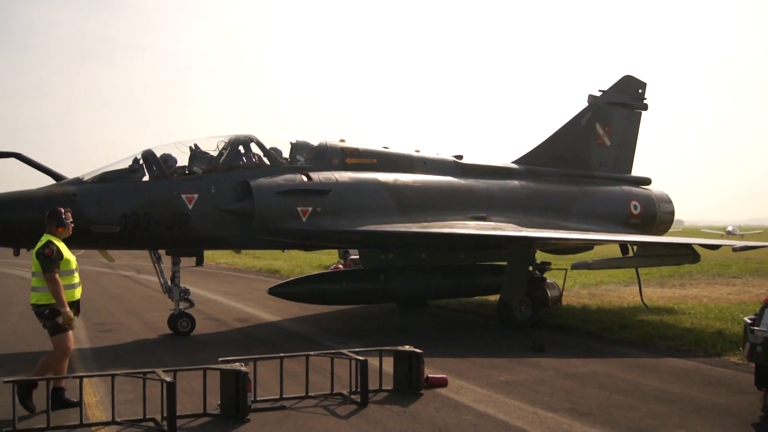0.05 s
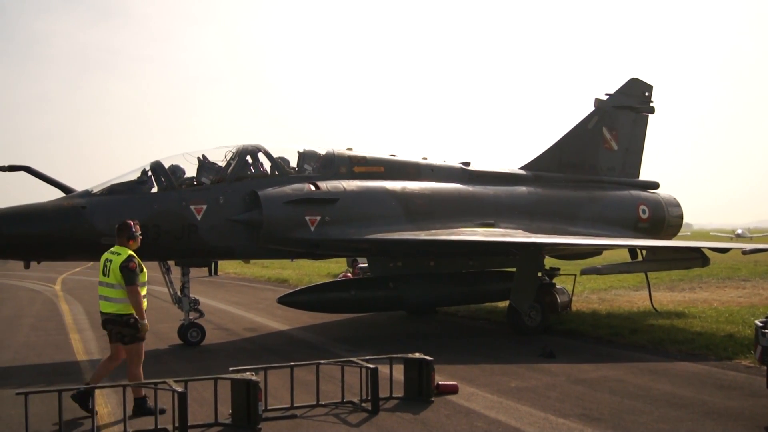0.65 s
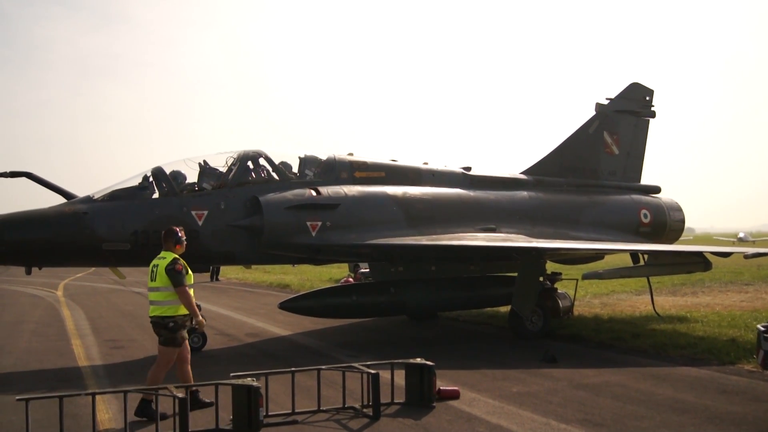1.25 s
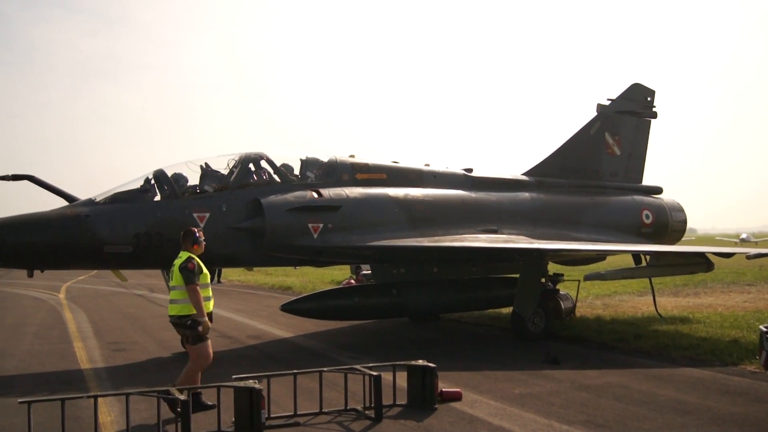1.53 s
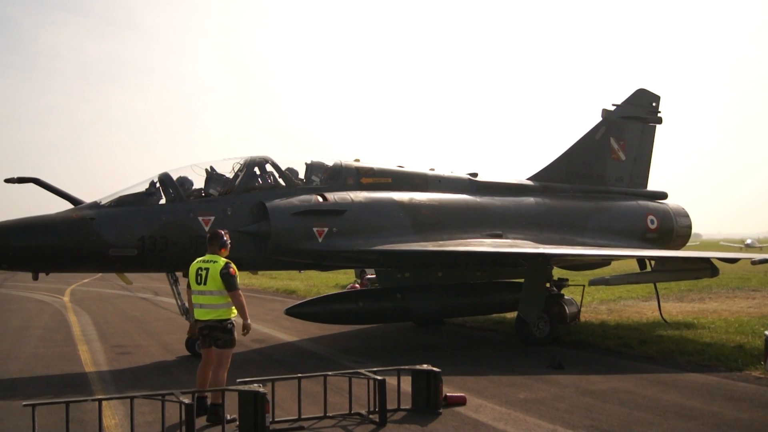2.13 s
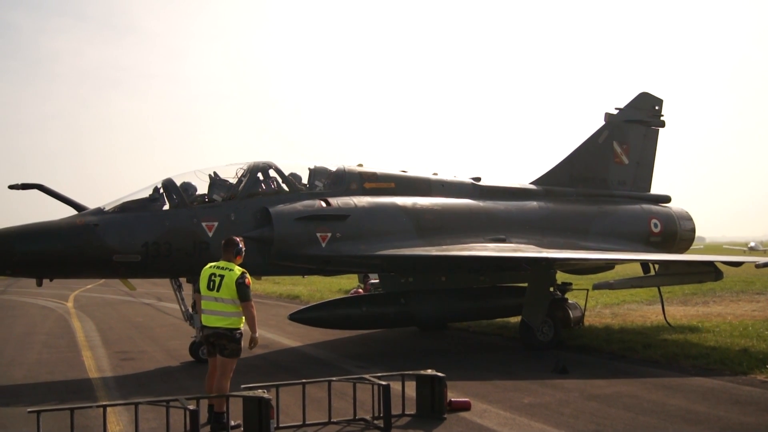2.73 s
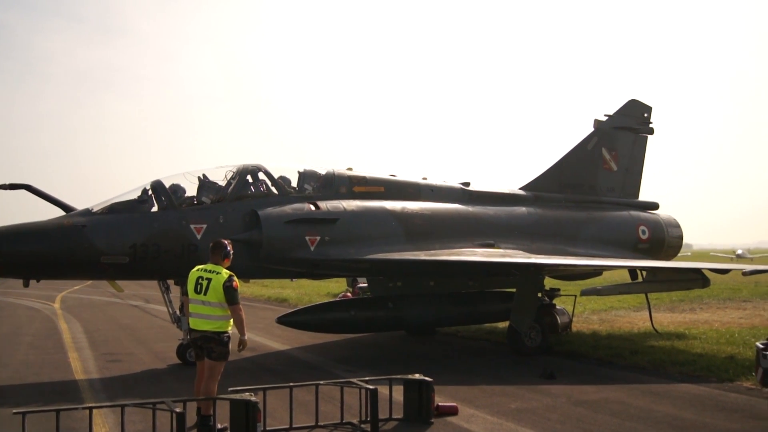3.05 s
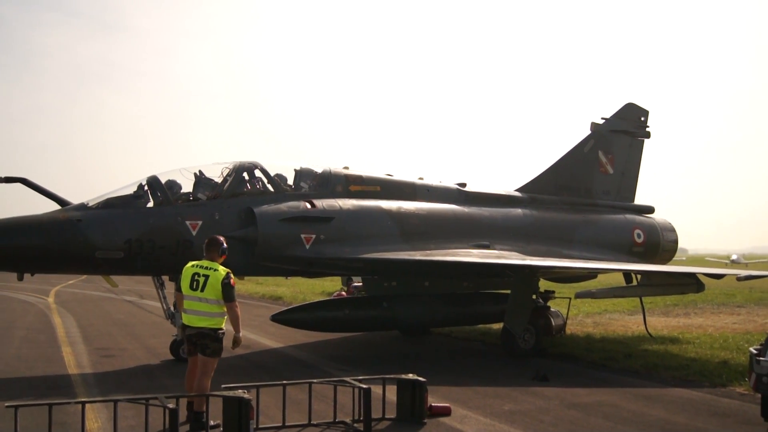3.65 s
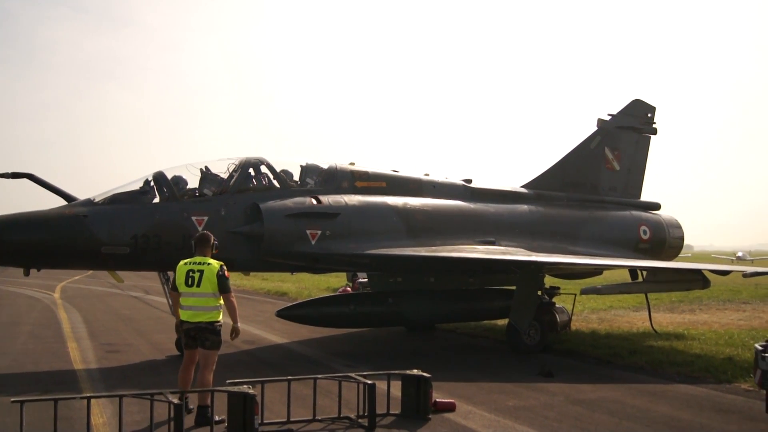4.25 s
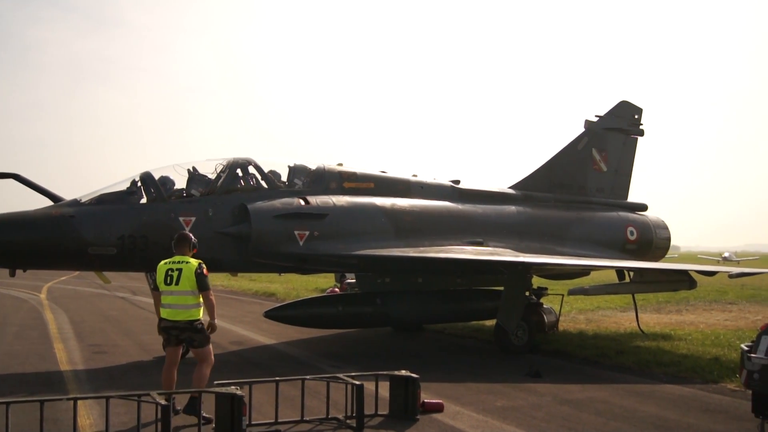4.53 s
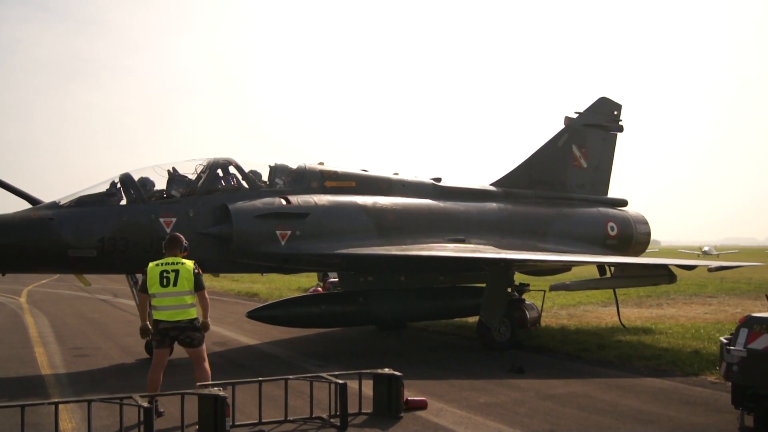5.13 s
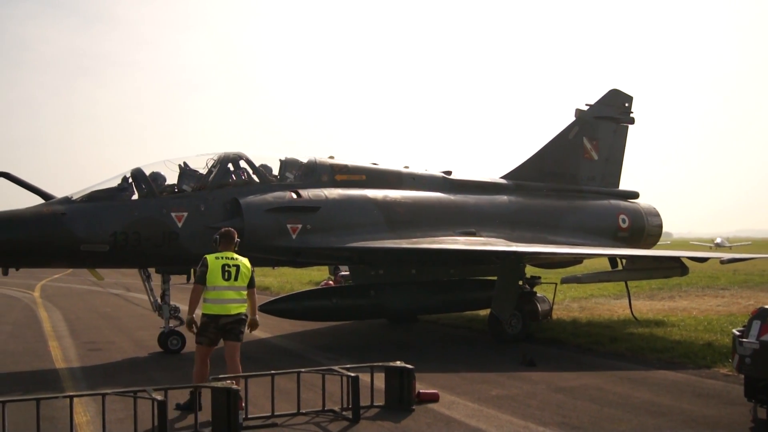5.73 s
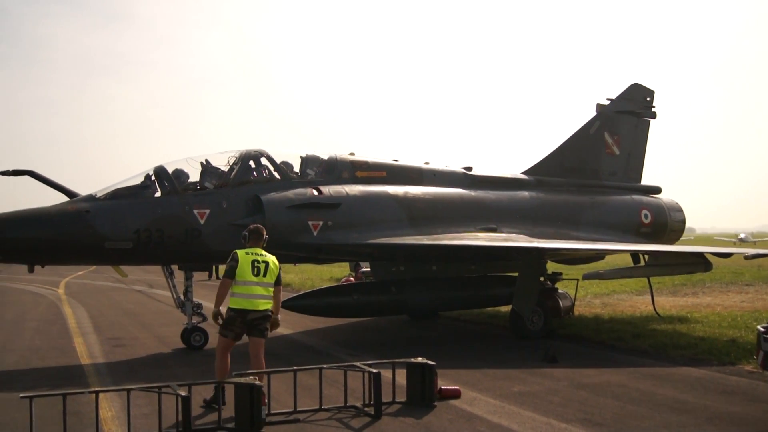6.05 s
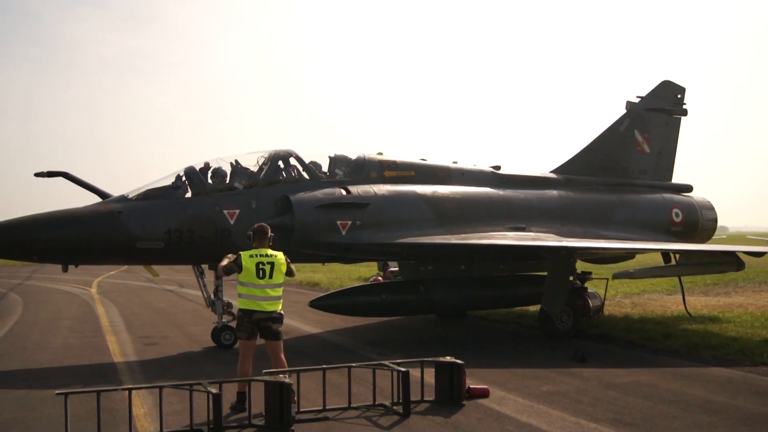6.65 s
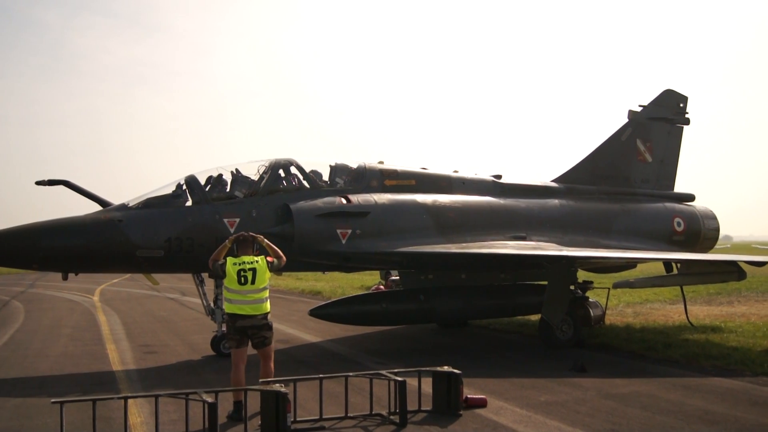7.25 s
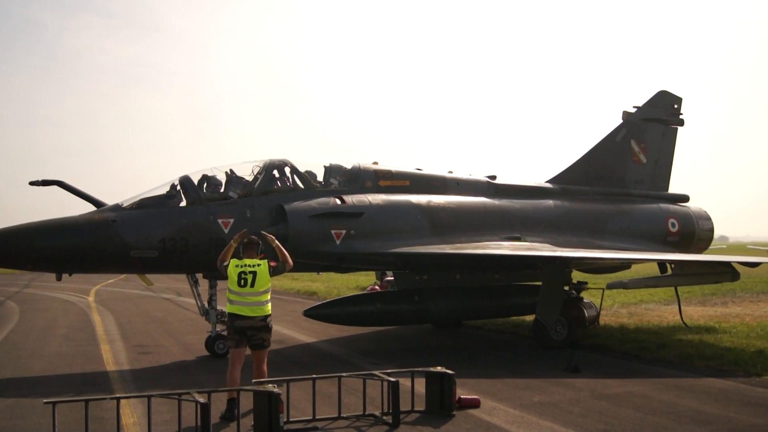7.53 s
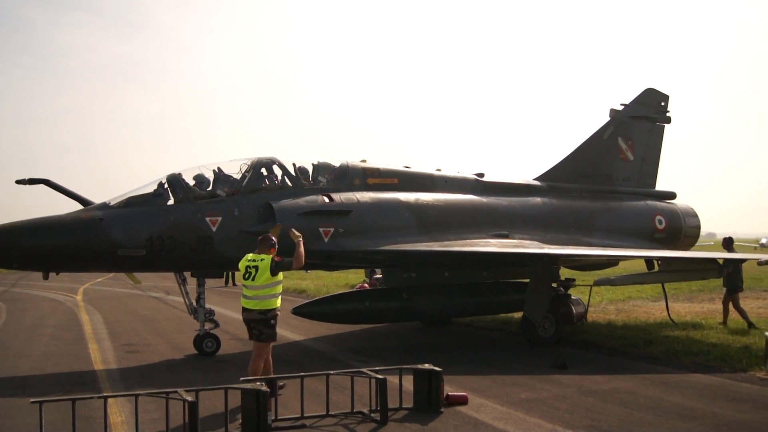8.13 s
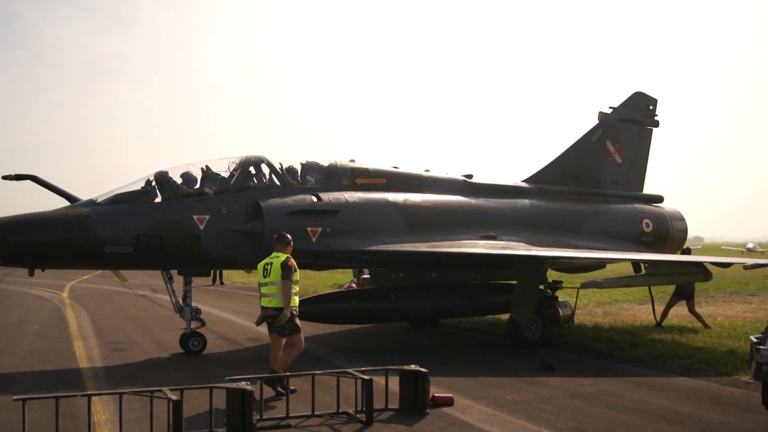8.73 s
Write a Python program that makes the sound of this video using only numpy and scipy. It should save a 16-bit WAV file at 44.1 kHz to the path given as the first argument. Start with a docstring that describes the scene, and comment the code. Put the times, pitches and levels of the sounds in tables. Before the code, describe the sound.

A fighter jet's engine is starting up on an open apron, heard side-on from some way off. A loud, steady rush of air fills all nine seconds, carrying a high whine and a lower howl, with only a very faint deep drone beneath. A hissing tone above the whine fades within the first second or two, and a faint, very high whistle slides down and vanishes by about 3 seconds. The whine and howl climb until about 4 seconds, the whine turning breathier after 2 seconds. A faint low rumble swells near 3.6 seconds and dies away. Around 4 to 4.5 seconds the pitch peaks and the howl weakens. Both then slide down until about 6 seconds, the howl returning and the whine ringing clearly again. The pitch lifts slightly, and from about 7.5 seconds the engine holds a steady idle.

```python
"""A jet fighter's engine starts on an open apron, heard side-on from some way off.
From the outset turbulent air roars through resonances that follow the turbine: a low howl, a high whine.
Early on a hissing tone fades and a small rotor coasts down with a thin whistle. The burner's rumble
swells at 3.6 s and dies away over a deep drone. Near 4 s the turbine overshoots and the howl breaks down;
it returns as the speed sags, and from about 7 s the engine settles at idle."""
import sys
import numpy as np
from scipy import signal
from scipy.io import wavfile

SR = 44100
rng = np.random.default_rng(int(sys.argv[2]) if len(sys.argv) > 2 else 0)


def store_pcm(level_fs):
    """Save levels as 16-bit WAV."""
    pcm = np.round(np.clip(level_fs, -1, 1) * 32767).astype(np.int16)
    wavfile.write(sys.argv[1], SR, np.atleast_2d(pcm).T)


N = 388080
FRAME, HOP = 2048, 256
T = np.arange(N) / SR
FRAME_T = np.arange(N // HOP + 3)[:, None] * HOP / SR
HZ = np.fft.rfftfreq(FRAME, 1 / SR)
IDLE_HZ = 4340  # whine pitch at idle


def gain_of(db):
    return 10 ** (np.asarray(db) / 20)


def unit_rms(x):
    return x / np.sqrt(np.mean(x ** 2) + 1e-20)


def over_frequency(rows):
    hz, value = np.transpose(rows)
    return np.interp(np.log(HZ + 1), np.log(hz + 1), value)


def over_time(rows, t=FRAME_T):
    return np.interp(t, *np.transpose(rows))


def by_speed(speed, idle_db, db_per_octave, db_per_octave_squared):
    """Level in dB at a speed in octaves above idle."""
    return idle_db + db_per_octave * speed + db_per_octave_squared * speed ** 2


def wander(slow_hz, fast_hz):
    """Random drift per frame, rms 1."""
    rates_hz = np.geomspace(slow_hz, fast_hz, num=30)
    return unit_rms(sum(np.sin(2 * np.pi * (hz * FRAME_T + rng.random())) for hz in rates_hz))


def narrow_noise(hz, width_hz):
    """Noise band on a pitch curve, rms 1."""
    pole = np.exp(-np.pi * width_hz / SR)
    white = rng.standard_normal(N) + 1j * rng.standard_normal(N)
    envelope = signal.lfilter([1], [1, -2 * pole, pole * pole], white)
    phase = 2 * np.pi * np.cumsum(hz * np.ones(N)) / SR
    return unit_rms((envelope * np.exp(1j * phase)).real)


def resonance(hz, relative_half_width, peak_db):
    """Power spectrum of one hump."""
    detune = (HZ / hz - 1) / relative_half_width
    return gain_of(peak_db) ** 2 / (1 + detune ** 2 / 2) ** 2


# Bass level of drone and roar. Each row: time in seconds, level in dB.
BASS_DB = [(0, 0.5), (3.1, 0.7), (3.65, 1.5), (4.2, -4.5), (5.3, -6), (6.1, 0), (7.1, 0.5), (8.8, -4.5)]


def drone(hz=48.5, base_db=-65.5, db_per_bass_db=1.2):
    """A deep drone that rises and falls with the bass."""
    db = base_db + db_per_bass_db * over_time(BASS_DB, T)
    return gain_of(db) * narrow_noise(hz, width_hz=12)


def burner(start_hz=312, end_hz=224, sink_s=1.5, base_db=-46.5, swell_s=3.62, fade_db_per_s=22):
    """The burner's rumble sinks in pitch as the engine spools up, swells once and dies away."""
    hz = end_hz + (start_hz - end_hz) * np.exp(-T / sink_s)
    swell_db = 9 * np.exp(-((T - swell_s) / 0.24) ** 2)
    db = base_db + swell_db - fade_db_per_s * np.maximum(T - swell_s, 0)
    return gain_of(db) * narrow_noise(hz, width_hz=30)


def rotor_whistle(start_hz=12850, coast_s=5.55, resonance_hz=10350, base_db=-49.5,
                  rise_db_per_s=1.5, fade_from_s=2.4, fade_db_per_s=35):
    """A small rotor coasts down and fades, loudest as it passes one resonance."""
    hz = start_hz * np.exp(-T / coast_s)
    resonance_db = 10.5 / (1 + ((hz - resonance_hz) / 340) ** 2)
    fade_db = fade_db_per_s * np.maximum(T - fade_from_s, 0)
    sides = np.array([narrow_noise(hz, width_hz=100) for _ in range(2)])
    return gain_of(base_db + resonance_db + rise_db_per_s * T - fade_db) * sides


# Turbine speed. Each row: time in seconds, whine pitch in Hz.
TURBINE_HZ = [(0.0, 3790), (0.45, 3890), (1.0, 4025), (2.0, 4350), (2.8, 4700), (3.95, 5508), (4.4, 5450),
              (4.75, 4899), (5.3, 4290), (5.9, 4069), (6.9, 4163), (7.6, 4345), (8.8, 4298)]


def hissing_tone(multiple=1.44, full_db=-33.5, fade_from_hz=3830, fade_db_per_octave=115):
    """A hissing tone above the whine, only at low speed."""
    whine_hz = over_time(TURBINE_HZ, T)
    db = full_db - fade_db_per_octave * np.maximum(np.log2(whine_hz / fade_from_hz), 0)
    return gain_of(db) * narrow_noise(multiple * whine_hz, width_hz=140)


# Ground notches. Each row: centre in Hz, half width in Hz, depth in dB.
GROUND_NOTCHES = [(592, 49, 9.5), (1377, 90, 13), (2380, 62, 21), (3510, 145, 8)]


def ground_loss_db():
    """The reflection off the tarmac cancels fixed bands."""
    return sum(db / (1 + ((HZ - hz) / width_hz) ** 2) for hz, width_hz, db in GROUND_NOTCHES)


# Likeness of the two sides. Each row: frequency in Hz, coherence from 0 to 1.
COHERENCE = [(50, .998), (250, .96), (1000, .96), (1400, .84), (2100, .8), (2600, .88), (3100, .76),
             (4250, .9), (5000, .68), (6500, .7), (8000, .54), (10000, .46), (11000, .29), (16000, .24)]
# Phase between the sides. Each row: frequency in Hz, lead of the left in radians.
LEFT_LEAD_RAD = [(50, 0), (450, 0), (1100, .28), (2500, .2), (4200, .5), (4800, .95), (7000, 1.0),
                 (8300, 1.6), (9500, 2.7), (16000, 2.9)]
# Balance. Each row: frequency in Hz, left minus right in dB.
BALANCE_DB = [(60, 0.0), (99, 0), (160, 1.5), (270, 1.5), (450, 2), (740, 0.5), (1220, 1), (2010, 0.5),
              (3330, -0.5), (5500, 0.5), (9080, -4.5), (15000, 3)]


def noise_at_microphones(magnitude):
    """Stereo noise of a given short-time spectrum, rms 1; the sides grow less alike toward the treble."""
    a, b, c, d = rng.standard_normal((4, *magnitude.shape))
    left, independent = a + 1j * b, c + 1j * d
    coherence = over_frequency(COHERENCE)
    right = coherence * left + np.sqrt(1 - coherence ** 2) * independent
    right = right * np.exp(-1j * over_frequency(LEFT_LEAD_RAD))
    pan = gain_of(over_frequency(BALANCE_DB) / 2)
    spectra = np.array([left * pan, right / pan]) * magnitude
    _, sides = signal.istft(spectra, nperseg=FRAME, noverlap=FRAME - HOP, time_axis=1, freq_axis=2)
    return unit_rms(sides[:, :N])


# Roar spectrum. Each row: frequency in Hz, relative level in dB.
ROAR_SPECTRUM_DB = [(100.0, -90), (150.0, -72.5), (270.0, -62.5), (360.0, -65.5), (470.0, -60.5),
                    (730.0, -54), (890.0, -57.5), (1150.0, -54.5), (1600.0, -56), (1950.0, -53),
                    (2200.0, -60.5), (2650.0, -53.5), (3100.0, -56), (4200.0, -52.5), (5500.0, -57.5),
                    (8700.0, -64), (11000.0, -72.5), (15500.0, -82)]
# Treble drift. Each row: time in seconds, level in dB two octaves above the treble corner.
TREBLE_DB = [(0, 1.5), (1.5, -1), (2.5, 1), (3.9, -0.8), (4.7, 1.3), (5.9, -1.7), (7.2, 0.5), (8.8, -0.2)]


def roar_db(speed, bass_corner_hz=350, treble_corner_hz=2000, flutter_db=.32):
    """Spectrum of the turbulent air; moving air on the way makes the treble flicker."""
    broad_db = over_frequency(ROAR_SPECTRUM_DB) + by_speed(speed, -.6, 5.5, 13)
    bass_db = over_time(BASS_DB) / (1 + (HZ / bass_corner_hz) ** 4)
    treble_db = by_speed(speed, .5, 4.6, -19) + over_time(TREBLE_DB) + flutter_db * wander(10, 50)
    treble_octaves = np.log2(np.maximum(HZ / treble_corner_hz, 1))
    return broad_db + bass_db + treble_db * treble_octaves / 2


# Duct resonances. Each row: multiple of the whine pitch, relative half width, level in dB,
# growth in dB per octave of speed.
DUCT_MODES = [(.447, 0.073, 0.6, 0), (.588, 0.074, -3.6, 16.5)]


def duct(whine_hz, lag_s=0.29, lift_db=0.6):
    """Wide duct resonances; the upper one builds up a little after the speed rises."""
    lagged_speed = np.log2(over_time(TURBINE_HZ, FRAME_T - lag_s) / IDLE_HZ)
    return sum(resonance(multiple * whine_hz, width, db + lift_db + growth * lagged_speed)
               for multiple, width, db, growth in DUCT_MODES)


def howl(speed, whine_hz, idle_hz=973, break_hz=5274, break_db_per_octave=108, flutter_db=.37):
    """Low resonance in unsteady flow; it narrows with speed and breaks down as the whine tops break_hz."""
    hz = idle_hz * 2 ** (1.04 * speed)
    break_db = break_db_per_octave * np.maximum(np.log2(whine_hz / break_hz), 0)
    db = by_speed(speed, 1.42, -18, 0) - break_db + flutter_db * wander(3, 14)
    skirt = resonance(.985 * hz, .134, db + 10.4)
    core = resonance(1.005 * hz, .026, db + 10.8 + 14 * speed)
    fixed_ring = resonance(920.7, .009, 2.5)  # rung as the howl passes
    return (skirt + core) * (1 + fixed_ring)


def whine(speed, hz, band_hz=4125, band_half_width_hz=262, lag_s=0.075, flutter_db=.35):
    """High resonance with an overtone; its core rings only while the pitch lies in one band of the duct."""
    lagged_hz = over_time(TURBINE_HZ, FRAME_T - lag_s)
    in_band = 1 / (1 + ((lagged_hz - band_hz) / band_half_width_hz) ** 20)
    db = by_speed(speed, 2.3, -15, -42) + flutter_db * wander(5.5, 18)
    skirt = resonance(1.014 * hz, .032, db + 5.1)
    core = resonance(hz, .01, db + 11 + 18 * speed)
    overtone = resonance(1.456 * hz, .045, by_speed(speed, 5.8, 5, -55))
    return skirt + in_band * core + overtone


def turbine(rms_db=-14.3, relative_jitter=.0015):
    """The roar through its moving resonances, combed by the ground."""
    steady_hz = over_time(TURBINE_HZ)
    speed = np.log2(steady_hz / IDLE_HZ)
    whine_hz = steady_hz * (1 + relative_jitter * wander(3, 18))
    power_gain = 1 + howl(speed, whine_hz) + whine(speed, whine_hz) + duct(whine_hz)
    magnitude = np.sqrt(power_gain) * gain_of(roar_db(speed) - ground_loss_db())
    return gain_of(rms_db) * noise_at_microphones(magnitude)


def scene():
    """All sources at the two microphones."""
    return turbine() + rotor_whistle() + hissing_tone() + drone() + burner()


def record(dry, knee=0.7, ceiling=.85, cutoff_hz=15750):
    """Rounds the highest peaks, then limits the band."""
    excess = np.maximum(abs(dry) - knee, 0)
    headroom = ceiling - knee
    rounded = dry + np.sign(dry) * (headroom * np.tanh(excess / headroom) - excess)
    lowpass = signal.firwin(2047, cutoff_hz, window=("kaiser", 9), fs=SR)
    return signal.oaconvolve(rounded, lowpass[None], "same")


dry = scene()
out = record(dry)
store_pcm(out)
```